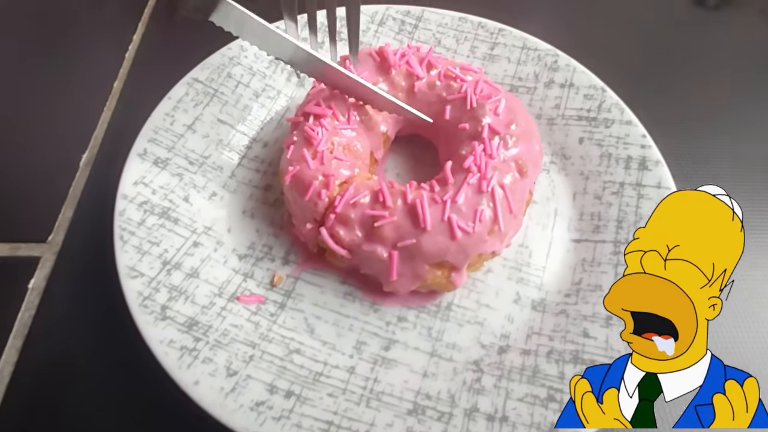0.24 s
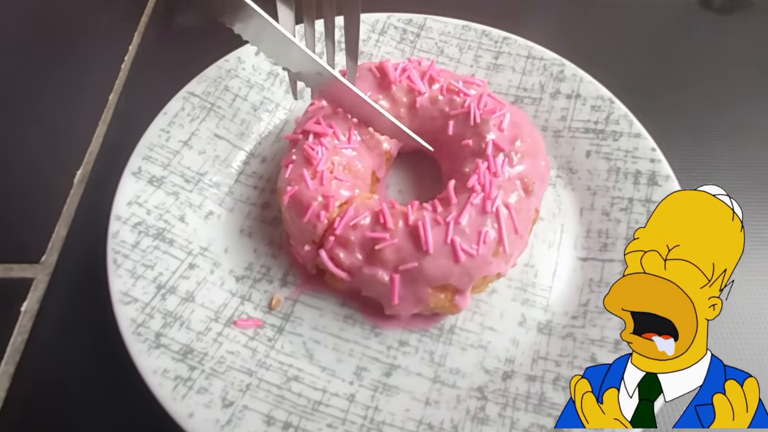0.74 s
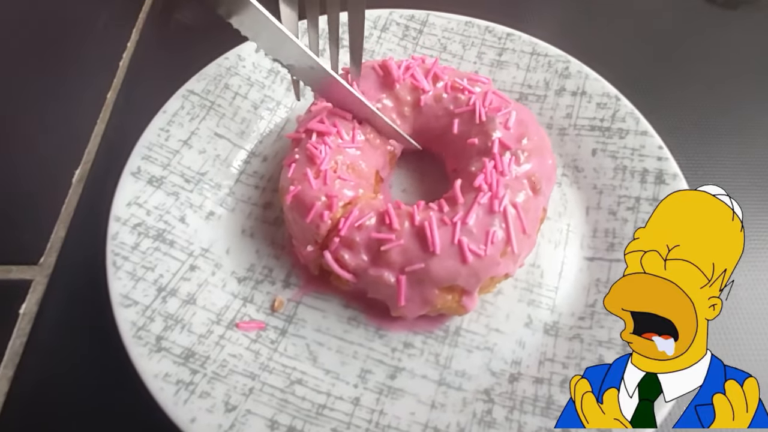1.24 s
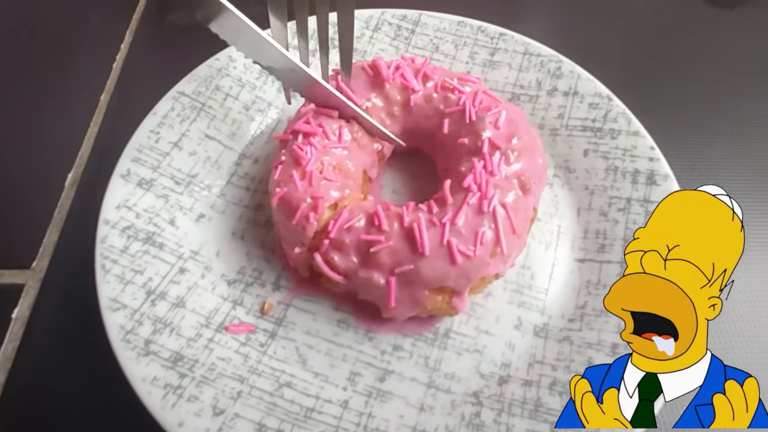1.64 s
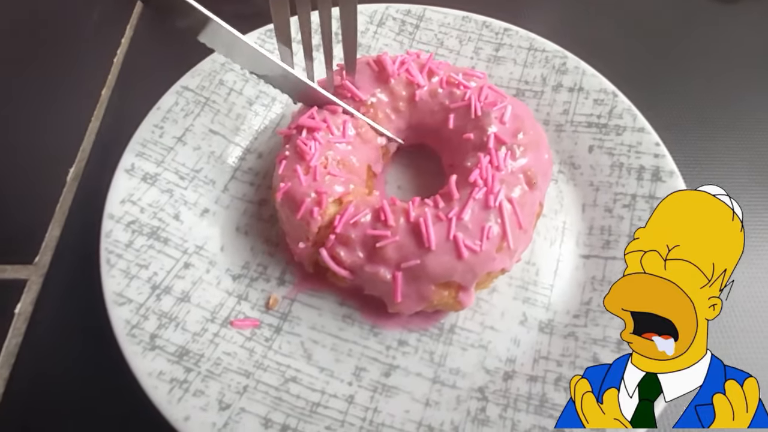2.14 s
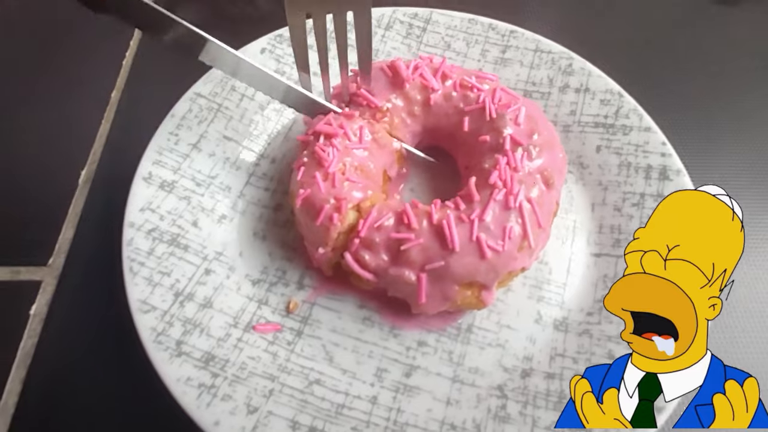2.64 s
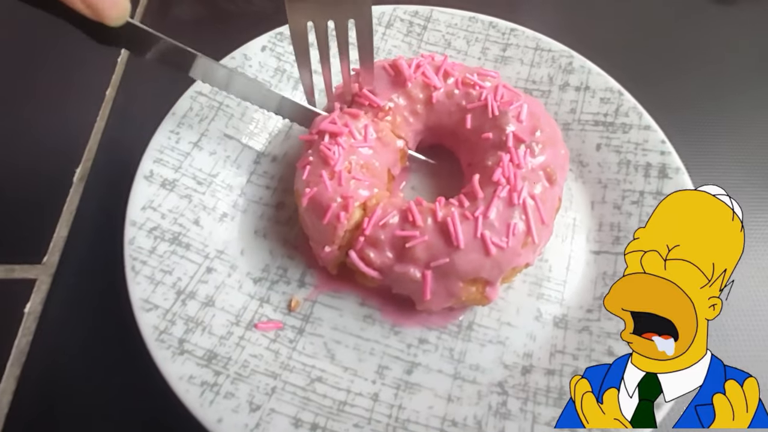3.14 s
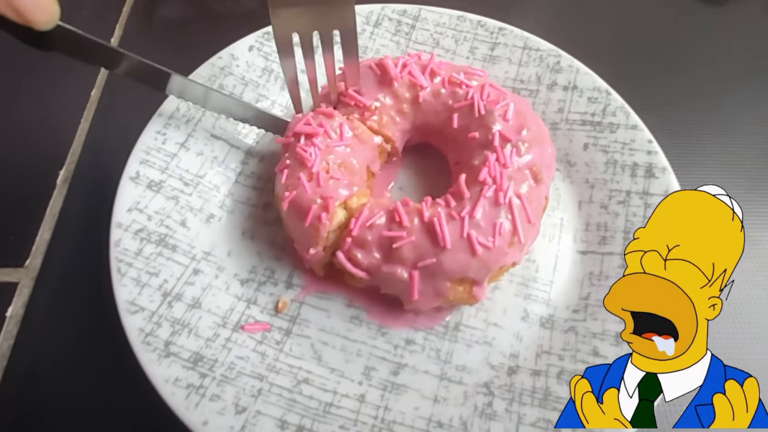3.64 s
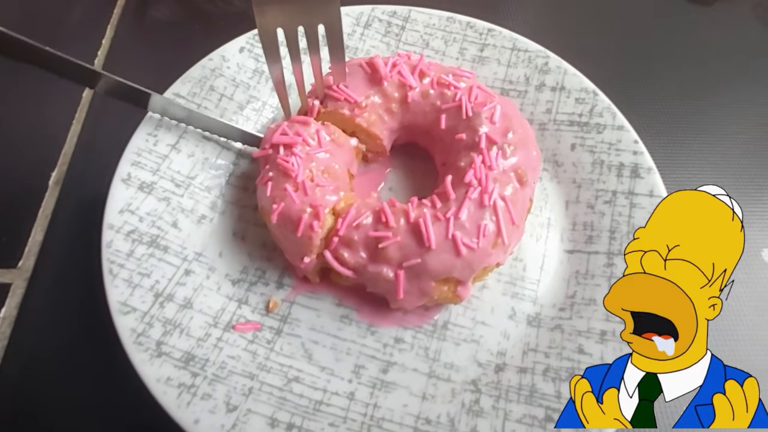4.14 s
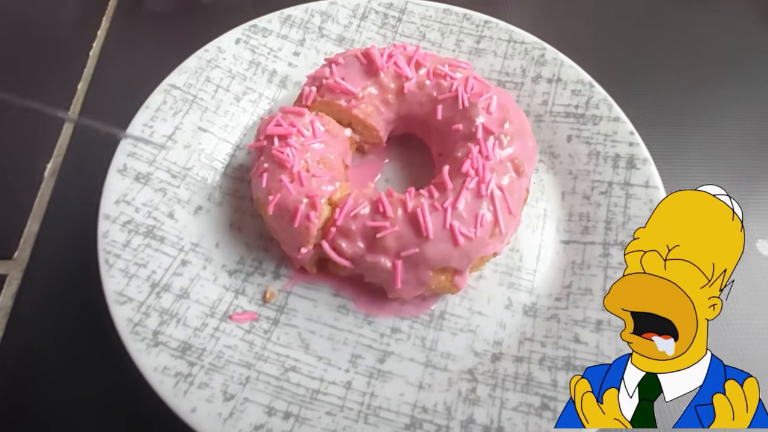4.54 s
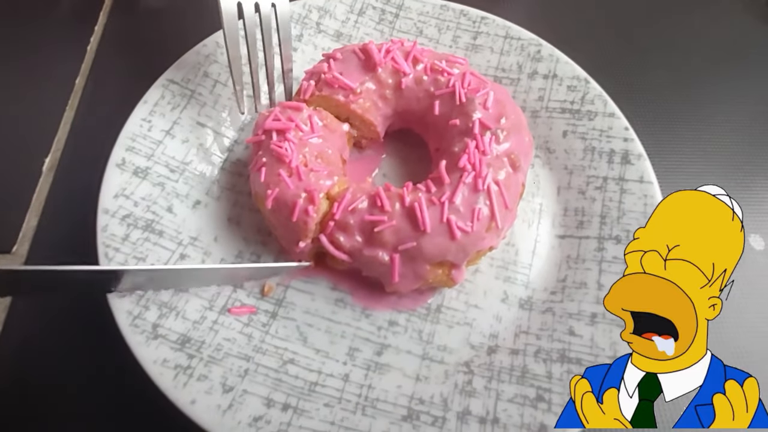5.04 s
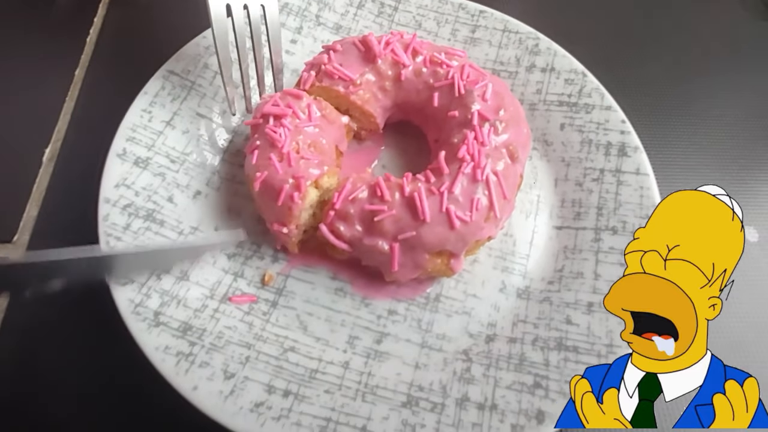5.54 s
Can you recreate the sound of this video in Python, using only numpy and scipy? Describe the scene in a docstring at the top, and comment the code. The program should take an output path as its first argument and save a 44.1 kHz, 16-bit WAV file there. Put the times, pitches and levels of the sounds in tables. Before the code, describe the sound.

A table knife cuts a sprinkled donut with soft crunches, then scrapes and clinks against a ceramic plate in a quiet kitchen.

```python
"""A small quiet kitchen: a table knife saws through an iced donut with sprinkles on a ceramic plate.
The dough tears in dull grains, the icing crackles in bright ones, and bits of sugar snap.
The blade knocks on the plate, ringing its modes, scrapes the glaze tooth by tooth and leaves with
a light clink. Behind it: low room rumble, faint steady whine and hiss, a thin tone that comes and goes."""
import sys
import numpy as np
from scipy import signal
from scipy.fft import rfft, irfft, next_fast_len
from scipy.io import wavfile
from scipy.ndimage import uniform_filter1d

SR = 44100
rng = np.random.default_rng(int(sys.argv[2]) if len(sys.argv) > 2 else 0)


def pcm_store(signal):
    """Save signal as 16-bit PCM."""
    levels = np.round(np.clip(np.atleast_2d(signal), -1, 1) * 32767)
    wavfile.write(sys.argv[1], SR, levels.astype(np.int16).T)


N = 255339
TIME_S = np.arange(N) / SR
RING_S = TIME_S[:SR * 3 // 4]   # time since an impact
ROOM_T60_S = 0.48
PAN = np.array([[.5], [-.5]])   # splits a left-right difference between the channels

# plate modes: (frequency [Hz])
MODE_HZ = [211, 568, 672, 851, 999, 1213, 1357, 1480, 1890, 2292, 2347, 2583, 2643, 3494, 3530, 4150, 4853,
           6353, 8010, 9840, 11830, 12920]
# the same modes: (level [dB], t60 [s], left-right [dB], left lead [rad])
MODES = [(0, 0.51, -0.5, -0.15), (-2.5, 0.15, 2.5, 1.1), (-2.5, 0.23, -1, -1.1), (-3.5, 0.05, 3.5, 0.2),
         (-11.5, 0.26, -3.5, 0.6), (-4.5, 0.17, 3, 1.14), (-2.5, 0.099, 7, 1.23), (-7, 0.13, 13, 0),
         (-12, 0.11, -1.5, -2.5), (-1, 0.34, 4.5, -0.8), (-3.5, 0.29, 2, -1.1), (-5.5, 0.4, 3.5, -3),
         (-12, 0.28, -4, 1.5), (1, 0.13, 6.5, 2), (-4.5, 0.11, -1.5, -0.5), (-7, 0.058, -0.5, 1.5),
         (-17.5, 0.3, -7, 2), (-4, 0.21, 1.5, 0.73), (-5.5, 0.21, -9, 2.5), (-5.5, 0.119, -5.5, -2),
         (-18.5, .17, -11, 2.2), (-14.5, .17, -6.5, 1.8)]
# plate registers, thud to glassy top:
# (low [Hz], high [Hz], rattle against modes [dB], rattle t60 [s], room tail [dB], build-up [s])
REGISTERS = [(145, 490, -0.5, 0.34, 3.5, 0.03), (389, 690, -1.5, 0.06, -4, 0.004),
             (712, 2100, 0.5, 0.26, -8.5, 0.0017), (2060, 3300, -1.5, 0.066, -8.5, 0.00043),
             (2994, 5500, -3.5, .09, -16, 0.0013), (5490, 16000, -0.5, 0.044, -7, 0.0008)]
# spectra of dough and icing: (frequency [Hz], level [dB])
DOUGH_SPECTRUM = [(130, -27.5), (220, -6), (320, -4), (450, -1.5), (680, -1.5), (900, -8.5), (1300, -9.5),
                  (1650, -8.5), (2300, -9.5), (3200, -20.5), (5000, -27.5)]
ICING_SPECTRUM = [(1470, -30.5), (2500, -14.5), (3110, -8.5), (4950, -19), (7470, -2.5), (10900, -9),
                  (12700, -5.5), (16000, -18.5)]
# balance of plate and donut: (frequency [Hz], left-right [dB])
PLATE_PAN = [(200, 1), (800, -0.5), (1600, 1), (2600, -11), (4200, -1), (6500, -2), (8500, -12),
             (15000, -3)]
DONUT_PAN = [(200, 3.5), (1000, 2), (3000, 2), (8000, -5.5), (15000, -5.5)]


def amp(db):
    return 10 ** (np.asarray(db) / 20)


def unit(x, size=None):
    """Scale to rms 1 over the first size samples."""
    return x / np.sqrt(np.mean(x[..., :size] ** 2) + 1e-20)


def at_hz(points, hz):
    point_hz, value = np.transpose(points)
    return np.interp(np.log(hz + 1e-9), np.log(point_hz), value)


def fade(t60_s):
    return amp(-60 * RING_S / t60_s)


def convolve(x, response):
    return signal.fftconvolve(np.atleast_2d(x), np.atleast_2d(response), axes=-1)[:, :x.shape[-1]]


def add(out, start_s, sound):
    start = int(start_s * SR)
    out[..., start:start + sound.shape[-1]] += sound[..., :N - start]


def noise(spectrum, pan, size=N, low_hz=15, high_hz=SR / 2):
    """Coloured stereo noise at rms 1, the channels most alike in the bass."""
    # channel likeness: (frequency [Hz], correlation before clipping [1])
    likeness = [(50, 1.1), (200, 0.7), (600, 0.56), (1200, 0.04), (2000, 0), (5000, -0.06), (15000, 0.5)]
    length = next_fast_len(size)
    hz = np.fft.rfftfreq(length, 1 / SR)
    mid, side = rfft(rng.standard_normal((2, length)))
    alike = np.clip(at_hz(likeness, hz), -1, 1)
    pair = np.sqrt(1 + alike) * mid + np.sqrt(1 - alike) * side * [[1], [-1]]
    gain = amp(at_hz(spectrum, hz) + at_hz(pan, hz) * PAN) * (hz > low_hz) * (hz < high_hz)
    return unit(irfft(pair * gain, length)[:, :size])


def grains(per_s, spread_db):
    """Random uneven clicks, short-term power near 1."""
    present = rng.random(N) < per_s / SR
    clicks = present * amp(spread_db * np.minimum(rng.exponential(1, N), 4))
    return clicks / np.sqrt(np.abs(uniform_filter1d(clicks ** 2, size=1500)) + 1e-6)


def bursts(clicks, t60_s, room_db):
    """Envelope of one burst per click, with room tail."""
    power = fade(t60_s) ** 2 + (amp(room_db) * fade(ROOM_T60_S)) ** 2
    return np.sqrt(np.abs(convolve(clicks ** 2, power / power.sum())))


def stroke(start_s, rise_s, hold_s, fall_s, db, range_db=20):
    """Gain that climbs range_db to db, holds, then sinks range_db per fall_s."""
    rising = (start_s + rise_s - TIME_S) / rise_s
    falling = (TIME_S - start_s - rise_s - hold_s) / fall_s
    below = np.clip(np.maximum(rising, falling), 0, 10)
    return amp(db - range_db * below) * (TIME_S >= start_s)


def knocks(contact_s=0.00074):
    """Blade strikes plate: hard contact favours the high registers, a pressed blade damps the ring."""
    # (time [s], level [dB], hardness [dB], favoured pitch [Hz], damping [dB/s], rattle [dB],
    #  twin modes [dB], extra on upper twin [dB])
    hits = [(1.615, -15.5, 4.5, 1237, 8.5, -0.5, 12, -1.5), (1.88, -43.5, -8.5, 1480, 100, 4, 0, 2),
            (2.081, -34.5, -7.5, 1200, 45, 0, 0, 0), (2.608, -42, -10.5, 1000, 28, -3.5, -4, -12),
            (3.034, -19.5, 3, 1520, 300, -6.5, 0, 6.5), (3.146, -20.5, -2, 1305, 279, -6.5, 0, 2.5),
            (3.165, -25.5, 1, 999, 299.5, -4.5, -8, 5.5), (3.373, -17, 4.5, 1350, 112.5, -0.5, -5.5, -0.5),
            (3.408, -30.5, -7.5, 1350, 60, -0.5, -4, -1.5), (3.801, -24.5, -3.5, 1470, 254, -2, -5, 15),
            (3.825, -22.5, -3, 1343, 302, -5.5, -8, 10), (4.285, -45.5, 23.5, 1204, 14, -7.5, 4, 28)]
    # per register: (drive [dB], share of hardness [1])
    drives = [(-27, -0.2), (-14.5, -0.1), (0, -0.21), (-5, 0.59), (-10, 0.89), (-22, 0.98)]
    out = np.zeros((2, N))
    for start_s, db, hardness_db, favoured_hz, damping_db_per_s, rattle_db, twins_db, upper_db in hits:
        for register, (drive_db, share) in zip(REGISTERS, drives):
            ring = plate(register, damping_db_per_s, rattle_db, favoured_hz, twins_db, upper_db)
            add(out, start_s + contact_s, amp(db + drive_db + share * hardness_db) * ring)
    return out


def scrapes(level_db=-1.06, teeth_per_s=105, tooth_db=3, rasp_db=-0.5):
    """The serrated edge slips over the glaze: each slip rasps and rings the upper registers."""
    # (start [s], rise [s], hold [s], fall [s], level [dB], hardness [dB])
    drags = [(1.552, 0.01, 0.023, 0.012, -43, -3), (1.586, 0.008, 0.0055, 0.011, -36.5, -5.5),
             (1.861, 0.023, 0.02, 0.058, -46, 7.5), (2.086, 0.02, 0.03, 0.027, -36, -7.5),
             (2.351, 0.05, 0.024, 0.024, -48, -1), (2.423, 0.015, 0.064, 0.055, -33.5, -3.5),
             (2.598, 0.031, 0.016, 0.08, -40.5, -2.5), (2.91, 0.02, 0.0098, 0.03, -40, 2),
             (2.955, 0.03, 0.045, 0.01, -38.5, -0.5), (3.308, 0.036, 0.024, 0.01, -47.5, 6),
             (3.519, 0.012, 0.01, 0.012, -54.5, 26), (3.746, 0.066, 0.0035, 0.012, -47, 24.5),
             (3.92, 0.024, 0.079, 0.03, -57.5, 35), (4.01, 0.029, 0.014, 0.021, -47, 29.5),
             (4.053, 0.02, 0.05, 0.18, -60, 18.5)]
    # per upper register: (drive [dB], share of hardness [1])
    drives = [(-0.5, 0.022), (-11.5, 0.74), (-14.5, 0.71), (-13.5, 0.94)]
    # rasp with blade resonances: (frequency [Hz], level [dB])
    rasp_spectrum = [(700, -5), (1400, -3), (1850, -13.5), (2450, -1.5), (3100, -30.5), (4000, -6.5),
                     (5400, -25), (6450, -11.5), (7200, -23.5), (8300, -13), (10500, -34), (13000, -33.5),
                     (16000, -45)]
    teeth = np.zeros(N)
    tooth_at = (np.cumsum(rng.uniform(0.41, 1.5, 1200)) * SR / teeth_per_s).astype(int)
    teeth[tooth_at[tooth_at < N]] = 1
    grit = grains(per_s=1100, spread_db=5.5) * rng.choice([-1, 1], N)
    slips = unit(amp(tooth_db) * unit(teeth) + grit)
    bite = bursts(slips, t60_s=0.015, room_db=-30)
    strokes = [(stroke(*shape), hardness_db) for *shape, hardness_db in drags]
    out = 0
    for k, (register, (drive_db, share)) in enumerate(zip(REGISTERS[2:], drives)):
        force = sum(gain * amp(drive_db + share * hardness_db) for gain, hardness_db in strokes)
        response = plate(register, damping_db_per_s=400, rattle_db=-2, favoured_hz=1500) * fade(0.56)
        ring = convolve(slips * force, response / np.sqrt(np.sum(response ** 2) / 2))
        rasp = bite * force * noise(rasp_spectrum, PLATE_PAN, low_hz=register[0], high_hz=register[1])
        rasp_share = (k + 1) / (len(REGISTERS) + 2)
        out = out + np.sqrt(1 - rasp_share) * ring + np.sqrt(rasp_share) * amp(rasp_db) * rasp
    return amp(level_db) * out


def plate(register, damping_db_per_s, rattle_db, favoured_hz, twins_db=0, upper_db=0):
    """One register of the struck plate: clear modes and a dense rattle with room tail."""
    # (frequency [Hz], level [dB])
    rattle_spectrum = [(150, -8.5), (330, -12.5), (430, -14), (560, -4.5), (950, -4.5), (1380, 0),
                       (1750, -8.5), (2400, -7), (3100, -23), (3900, -8), (5500, -27), (6600, -22.5),
                       (8300, -25.5), (10500, -36), (16000, -43.5)]
    low_hz, high_hz, dense_db, dense_t60_s, room_db, build_up_s = register
    twins_hz, favour_db, scatter_db = (2292, 2347), 6, 3
    attack = int(.03 * SR)
    damping = amp(-damping_db_per_s * RING_S)
    ring = np.zeros((2, len(RING_S)))
    for hz, (db, t60_s, pan_db, lead_rad) in zip(MODE_HZ, MODES):
        if low_hz <= hz < high_hz:
            # the contact point favours modes near one pitch and weights the beating twins
            db += favour_db * np.exp(-((hz - favoured_hz) / 80) ** 2)
            db += twins_db * (hz in twins_hz) + upper_db * (hz == max(twins_hz))
            db += scatter_db * rng.standard_normal()
            phase = rng.uniform(0, 2 * np.pi) + lead_rad * PAN
            ring += amp(db + pan_db * PAN) * np.sin(2 * np.pi * hz * RING_S + phase) * fade(t60_s)
    ring = reflections(ring * damping)
    decay = np.hypot(fade(dense_t60_s) * damping, amp(room_db) * fade(ROOM_T60_S))
    rattle = noise(rattle_spectrum, PLATE_PAN, len(RING_S), low_hz, high_hz) * decay
    mix = unit(ring, attack) + amp(dense_db + rattle_db) * unit(rattle, attack)
    rise = 1 - np.exp(-RING_S / build_up_s)
    return unit(mix * rise, attack)


def reflections(x, wet_db=-8.5, t60_s=0.26, delay_s=0.004):
    """Counter and walls return a dense spray of echoes."""
    flat = [(1000, 0)]
    spray = noise(flat, flat, size=len(RING_S)) * fade(t60_s) * (RING_S > delay_s)
    return x + amp(wet_db) * convolve(x, spray / np.sqrt(np.sum(spray ** 2) / 2))


def cutting(dough_db=-1, icing_db=1):
    """Each pass tears dough in dull grains and crumbles icing in fine bright ones."""
    # (start [s], rise [s], hold [s], fall [s], dough [dB], icing [dB])
    passes = [(0.852, 0.044, 0.056, 0.045, -38, -53), (1.076, 0.051, 0.038, 0.1, -44, -55),
              (1.306, 0.004, 0.14, 0.046, -39.5, -45), (1.325, 0.034, 0.0096, 0.011, -29.5, -54),
              (1.952, 0.013, 0.008, 0.12, -47, -53), (2.116, 0.02, 0.18, 0.16, -53.5, -61.5),
              (3.53, 0.062, 0.085, 0.031, -57.5, -56.5), (5.422, 0.04, 0.058, 0.077, -60, -60.5)]
    tearing = sum(stroke(*shape, db) for *shape, db, _ in passes)
    crumbling = sum(stroke(*shape, db) for *shape, _, db in passes)
    tears = bursts(grains(per_s=670, spread_db=4) * tearing, t60_s=0.05, room_db=-25.5)
    crumbs = bursts(grains(per_s=480, spread_db=1) * crumbling, t60_s=0.0081, room_db=-26.5)
    dough = amp(dough_db) * tears * noise(DOUGH_SPECTRUM, DONUT_PAN)
    icing = amp(icing_db) * crumbs * noise(ICING_SPECTRUM, DONUT_PAN)
    return dough + icing


def crunches(level_db=-8, t60_s=0.021, room_db=-21, contact_s=0.0009):
    """The crust gives way against the plate with short dull knocks."""
    # (time [s], level [dB])
    breaks = [(0.892, -27), (0.905, -21), (0.939, -26), (1.128, -36.5), (1.313, -28.5), (1.326, -24),
              (1.351, -8.5), (1.362, -18), (1.367, -11.5), (1.382, -27), (1.401, -16), (1.962, -28.5),
              (4.855, -45.5), (5.696, -43)]
    decay = np.hypot(fade(t60_s), amp(room_db) * fade(ROOM_T60_S))
    power = np.zeros(N)
    for start_s, db in breaks:
        add(power, start_s + contact_s, (amp(db + level_db) * decay) ** 2)
    return np.sqrt(power) * noise(DOUGH_SPECTRUM, DONUT_PAN)


def plate_hum(x, highpass_hz=180, hum_db=11):
    """Deep bass is filtered off the cutting; the plate's lowest mode hums on after each stroke."""
    decay = fade(t60_s=MODES[0][1])
    mode = np.cos(2 * np.pi * MODE_HZ[0] * RING_S) * decay * 2 / decay.sum()
    x = signal.sosfilt(signal.butter(2, highpass_hz, "high", fs=SR, output="sos"), x)
    return x + amp(hum_db) * convolve(x.mean(axis=0), mode)


def snaps(level_db=-5, t60_s=0.012, room_db=-27, peak_db=6):
    """Each breaking sprinkle or bit of icing gives one bright tick with its own pitch."""
    # (time [s], level [dB], pitch [Hz])
    ticks = [(0.032, -30, 10000), (0.893, -33.5, 7650), (0.906, -29, 7800), (0.9375, -34, 7600),
             (1.127, -35, 7980), (1.179, -32, 7500), (1.272, -39, 8140), (1.3118, -24.5, 7900),
             (1.3818, -16.5, 12600), (1.4038, -11.5, 12800), (1.436, -24, 12400), (1.477, -18, 8150),
             (1.775, -28.5, 8100), (1.7946, -26, 7700), (1.966, -33, 7800), (4.7255, -39.5, 8400),
             (4.788, -42.5, 8740), (4.8778, -43.5, 8350), (5.6955, -41.5, 7900)]
    # (frequency [Hz], left-right [dB])
    pan = [(3000, 0), (8000, -10), (12500, -5)]
    decay = np.hypot(fade(t60_s), amp(room_db) * fade(0.3))
    out = np.zeros((2, N))
    for start_s, db, pitch_hz in ticks:
        spectrum = [(hz, icing_db + peak_db * np.exp(-(np.log(hz / pitch_hz) / .3) ** 2))
                    for hz, icing_db in ICING_SPECTRUM]
        add(out, start_s, amp(db + level_db) * decay * noise(spectrum, pan, size=len(RING_S)))
    return out


def thin_tone(pitch_hz=2830, waver_hz=50, flutter=0.43):
    """A faint tone comes and goes, wavering in pitch and level."""
    hz = pitch_hz + waver_hz * unit(uniform_filter1d(rng.standard_normal(N), size=120))
    flicker = 1 + flutter * unit(uniform_filter1d(rng.standard_normal(N), size=500))
    gain = stroke(start_s=2.5, rise_s=0.002, hold_s=0.6, fall_s=0.7, db=-66)
    return flicker * gain * np.sin(2 * np.pi * np.cumsum(hz) / SR)


def background(rumble_start_db=-57.5, rumble_end_db=-59.5, hiss_db=-66, whine_db=-63):
    """Slowly easing room rumble, steady hiss and a narrow whine."""
    # spectra: (frequency [Hz], level [dB])
    rumble_spectrum = [(15, -48), (25, -24), (60, -8.5), (150, 0), (220, -3.5), (240, -8.5), (271, -5),
                       (340, -7), (419, -14), (525, -13.5), (670, -20.5), (719, -22), (1600, -18),
                       (2080, -54), (3520, -120)]
    hiss_spectrum = [(1400, -31), (1650, -5), (2300, -3), (2700, -9), (3300, -15.5), (4400, -9.5),
                     (5700, -23), (6800, -16), (7200, -4.5), (8700, -3), (9200, -19), (15500, -19),
                     (16600, -29.5)]
    whine_spectrum = [(1600, -37.5), (1780, -12.5), (1900, -6.5), (1975, -3), (2060, -19.5), (2250, -32)]
    # (frequency [Hz], left-right [dB])
    pan = [(60, 3), (150, -4), (380, 0), (950, 0.5), (2380, -4.5), (5980, -7), (15000, -8)]
    rumble = amp(np.linspace(rumble_start_db, rumble_end_db, N)) * noise(rumble_spectrum, pan)
    hiss = amp(hiss_db) * noise(hiss_spectrum, pan)
    whine = amp(whine_db) * noise(whine_spectrum, pan)
    return rumble + hiss + whine


def scene():
    return knocks() + scrapes() + thin_tone() + plate_hum(cutting() + crunches()) + snaps() + background()


def record(dry):
    """Clip at full scale, then low-pass steeply."""
    cutoff_hz = 16300
    lowpass = signal.ellip(10, .1, 80, cutoff_hz, fs=SR, output="sos")
    return signal.sosfilt(lowpass, np.clip(dry, -1, 1))


dry = scene()
out = record(dry)
pcm_store(out)
```